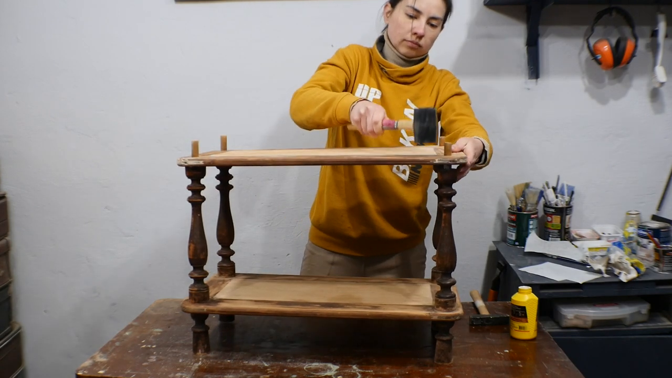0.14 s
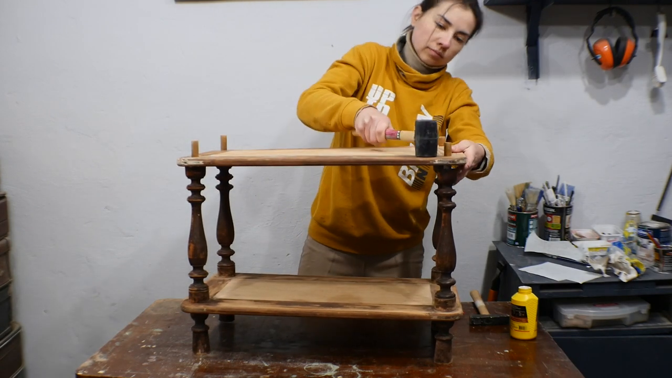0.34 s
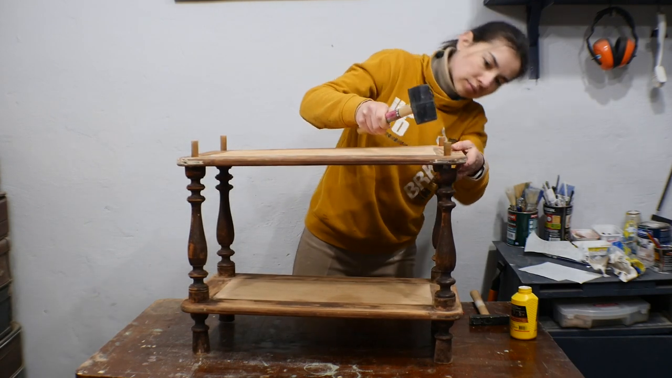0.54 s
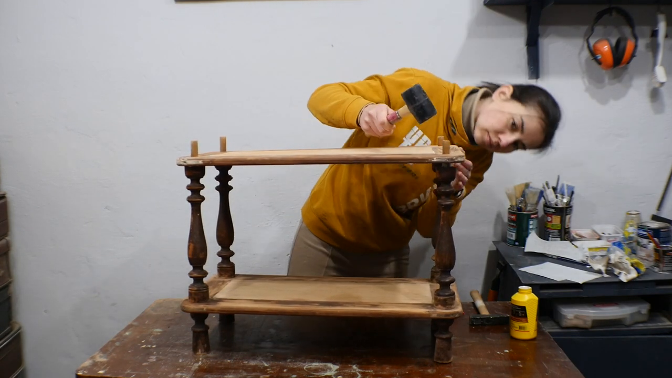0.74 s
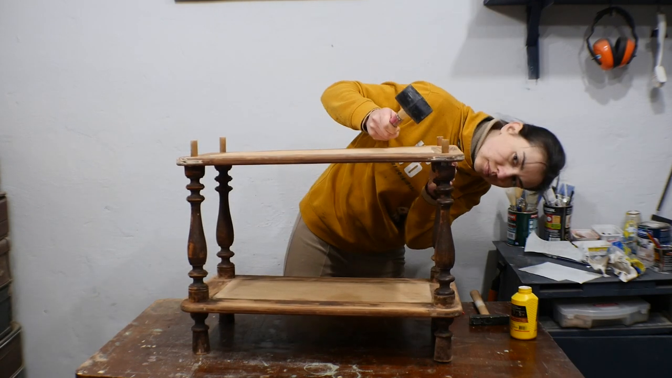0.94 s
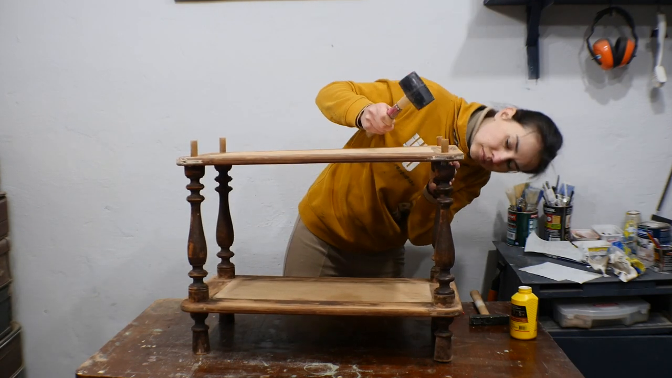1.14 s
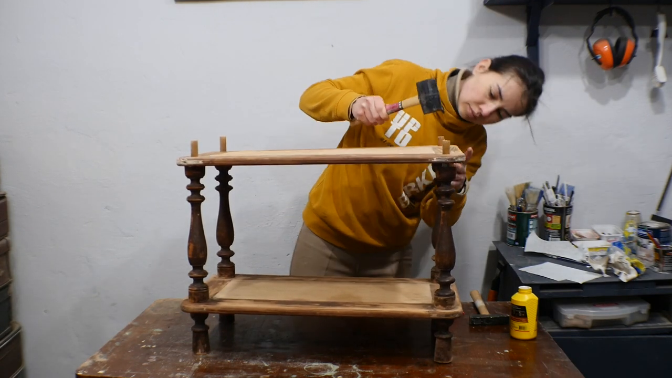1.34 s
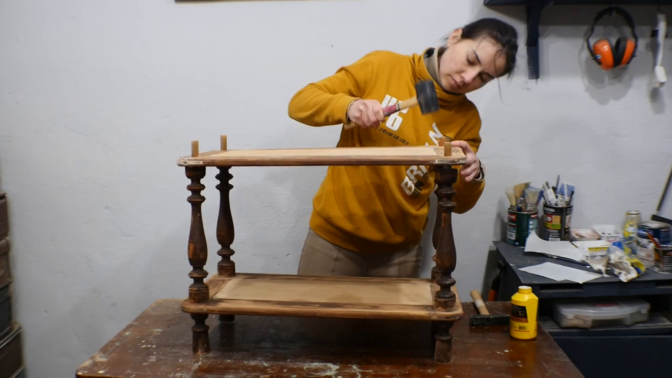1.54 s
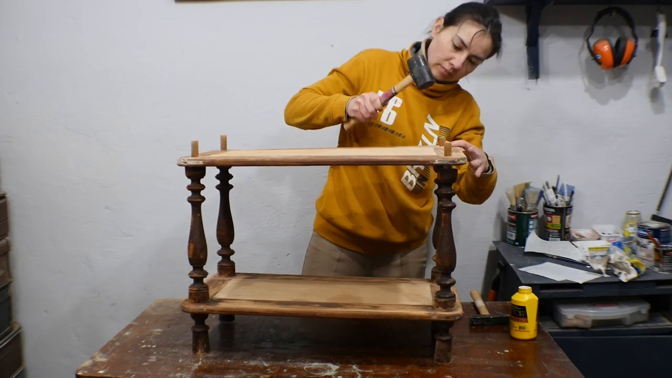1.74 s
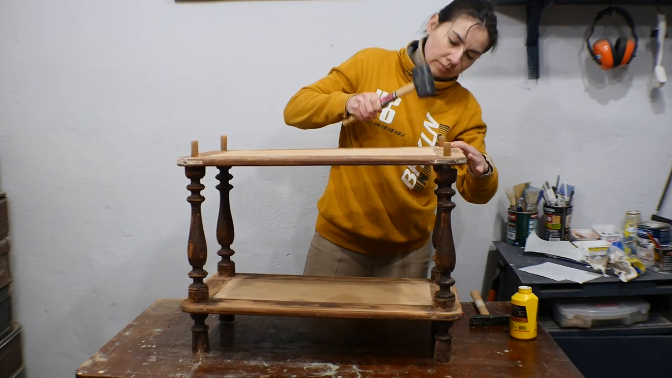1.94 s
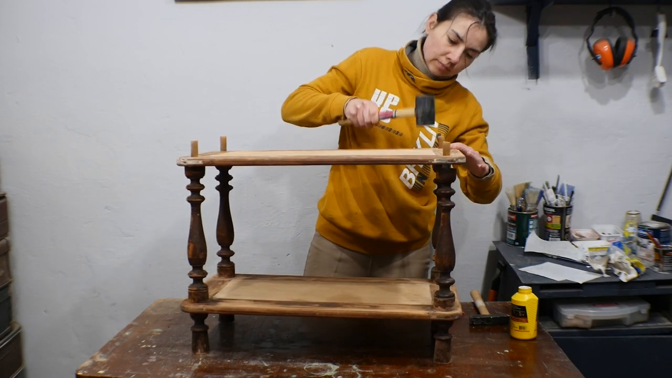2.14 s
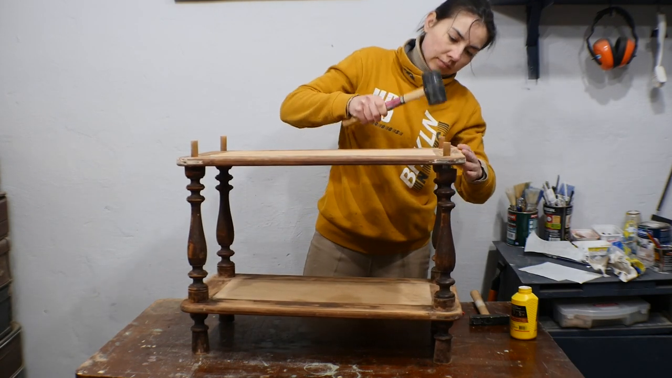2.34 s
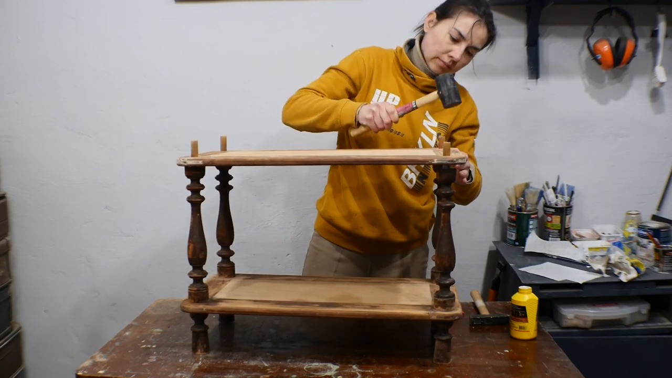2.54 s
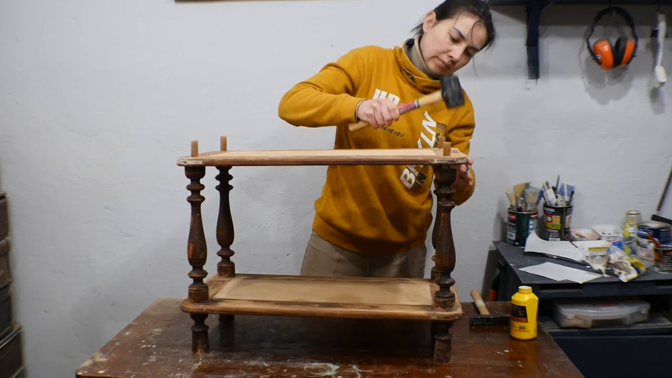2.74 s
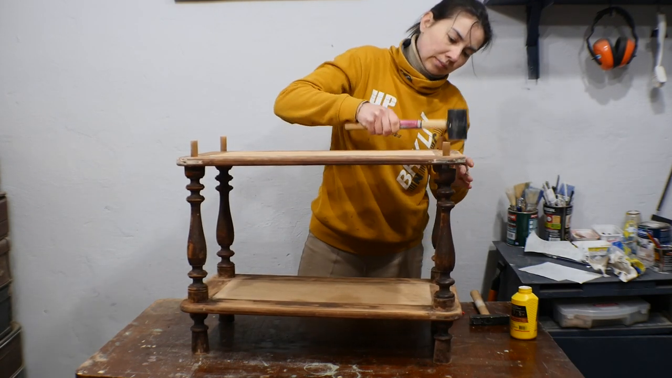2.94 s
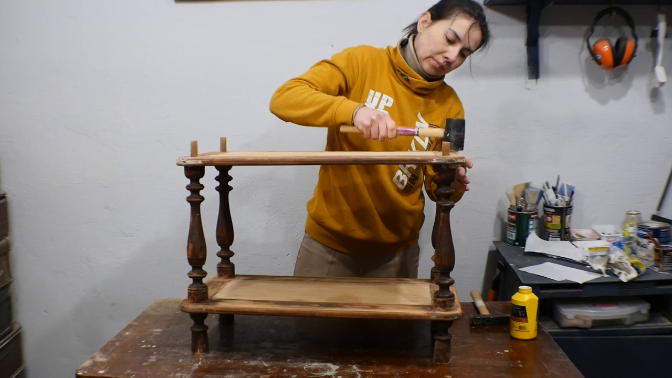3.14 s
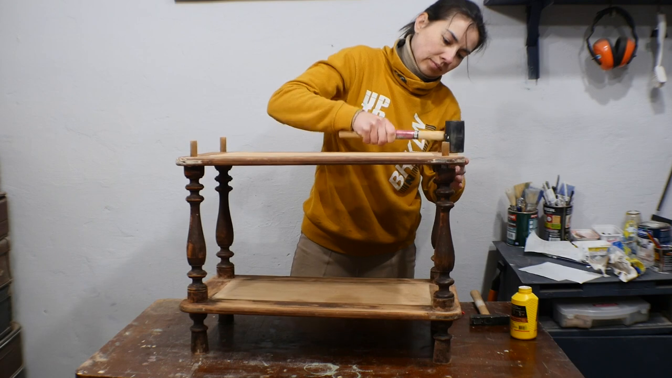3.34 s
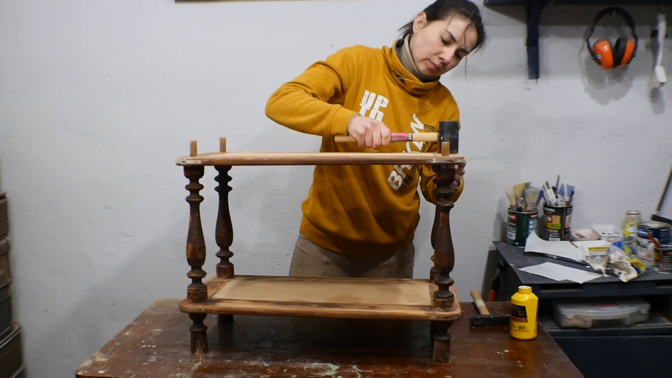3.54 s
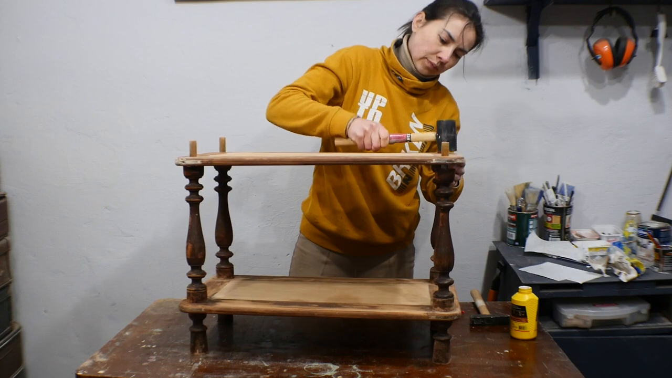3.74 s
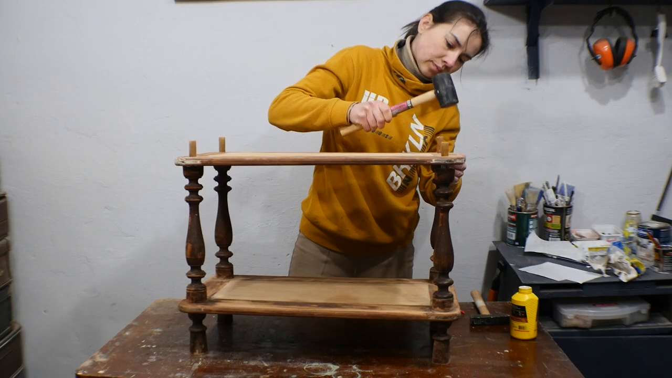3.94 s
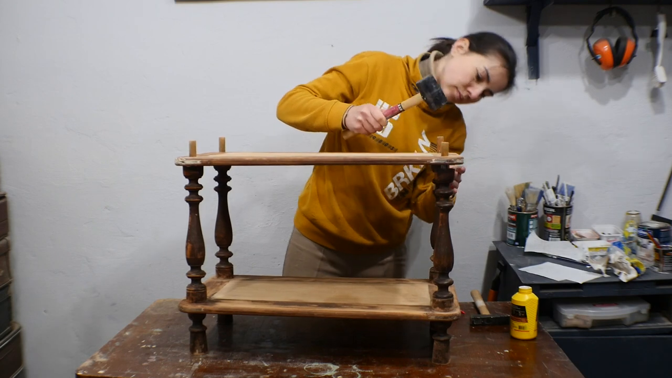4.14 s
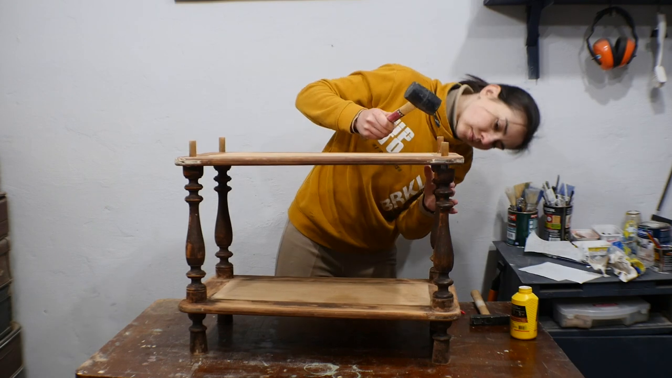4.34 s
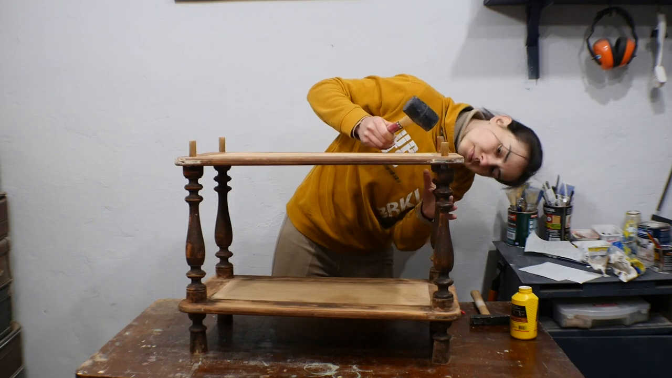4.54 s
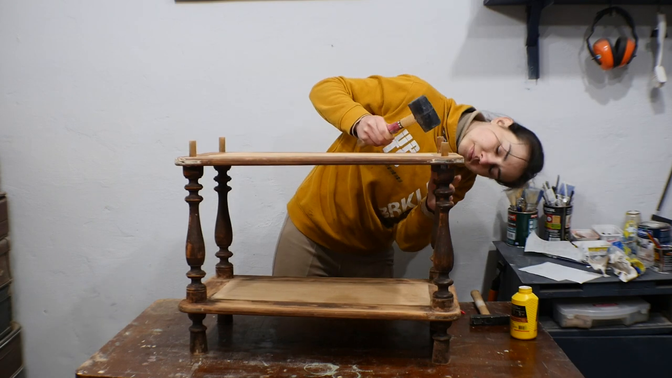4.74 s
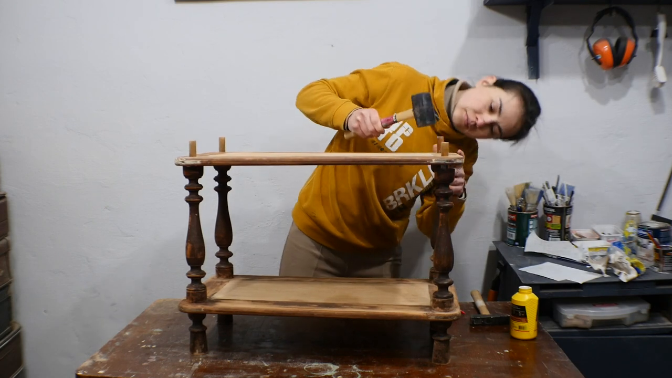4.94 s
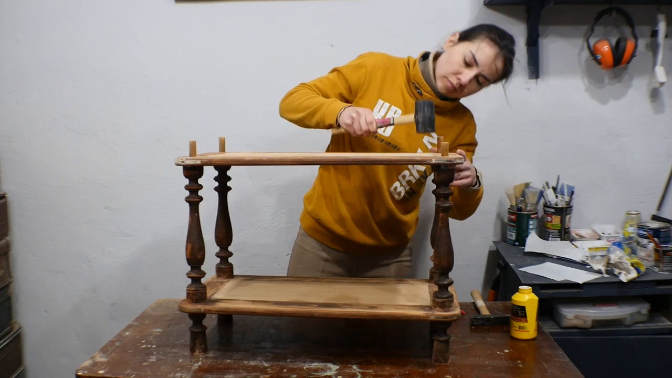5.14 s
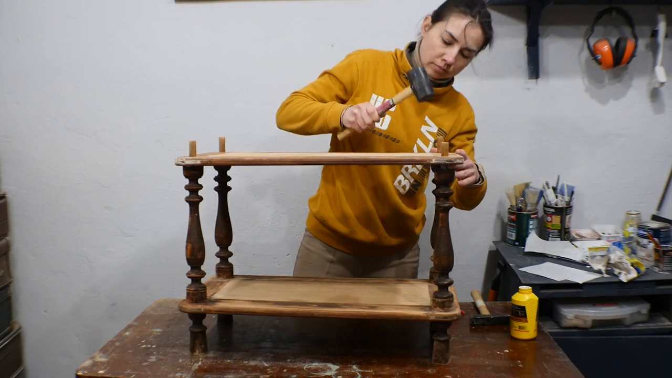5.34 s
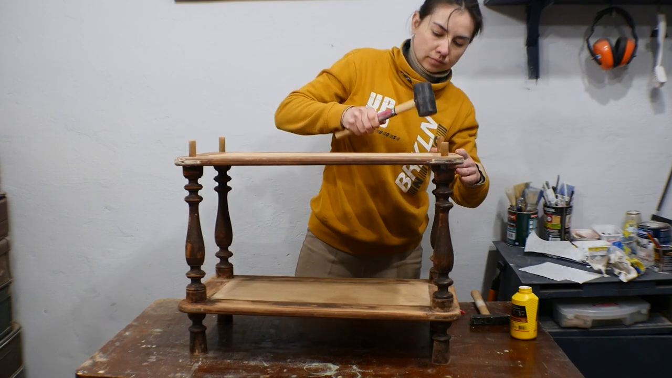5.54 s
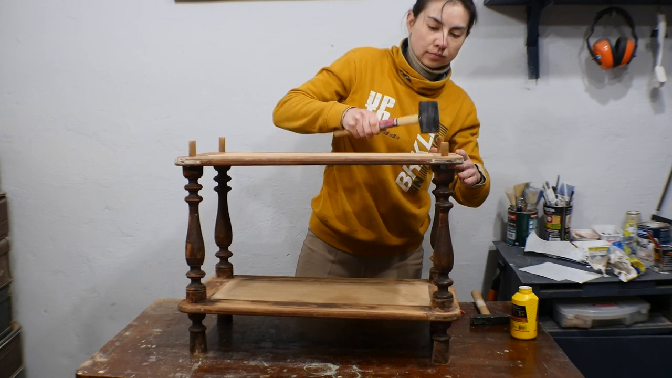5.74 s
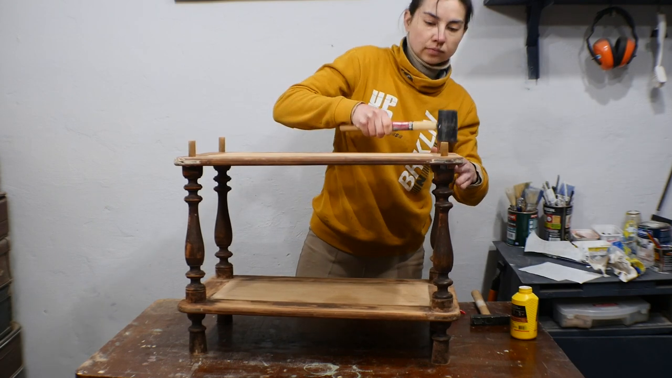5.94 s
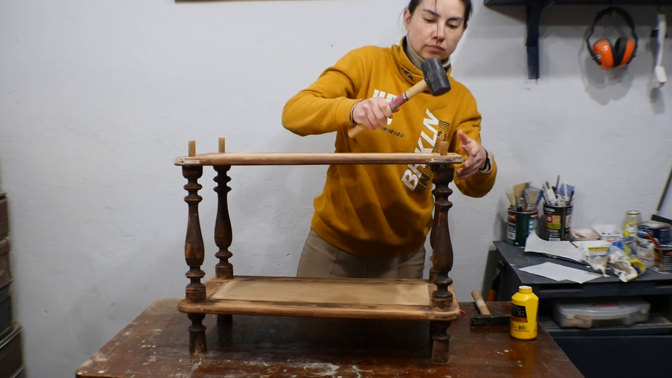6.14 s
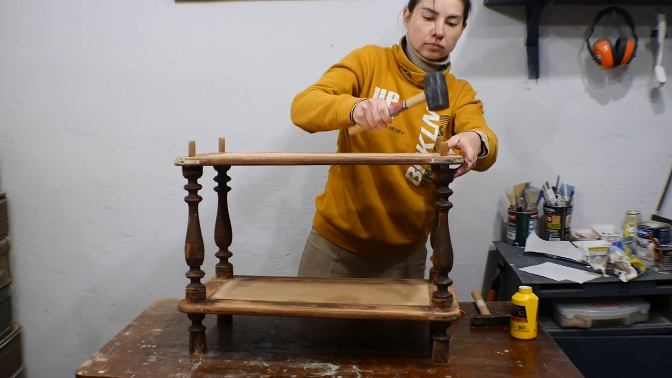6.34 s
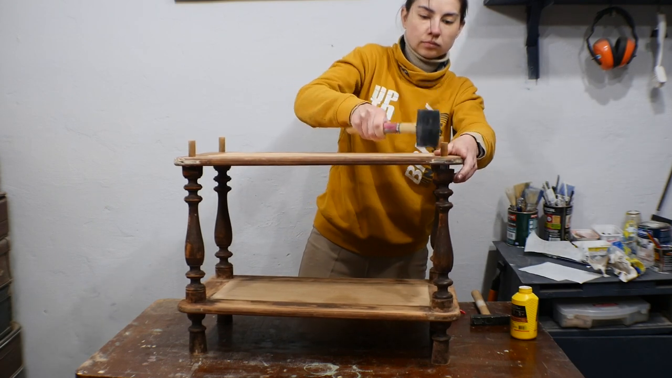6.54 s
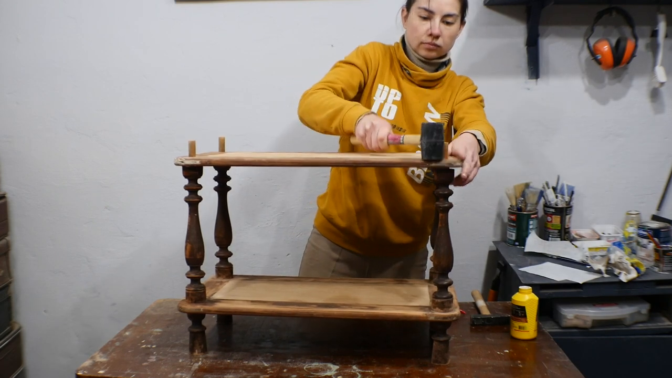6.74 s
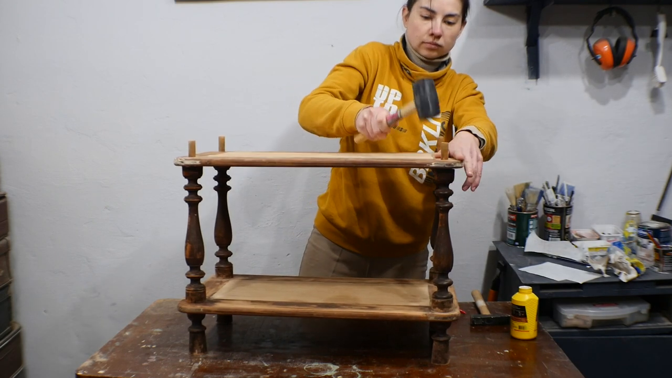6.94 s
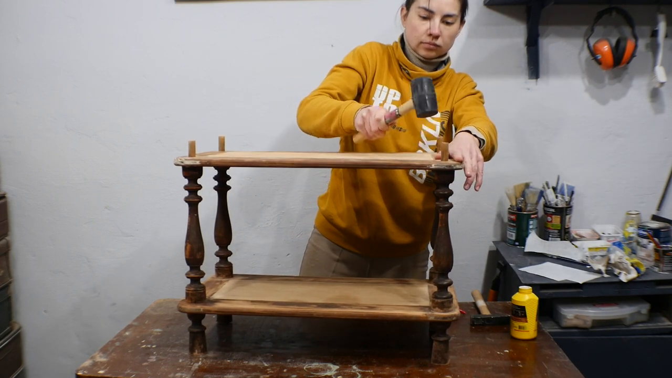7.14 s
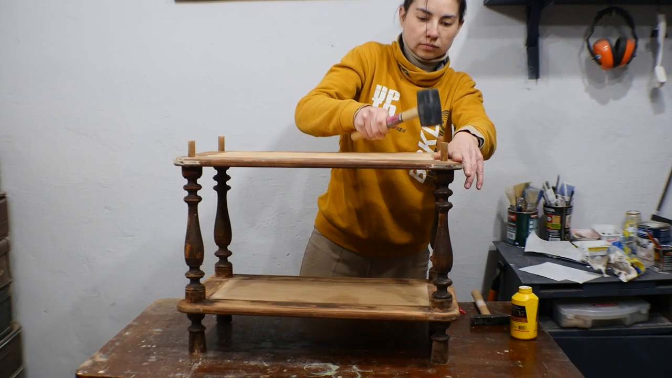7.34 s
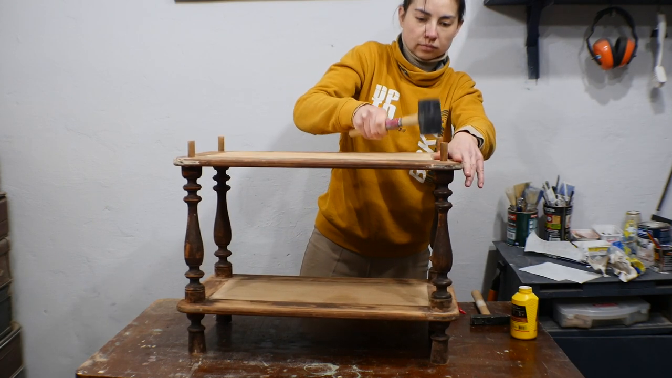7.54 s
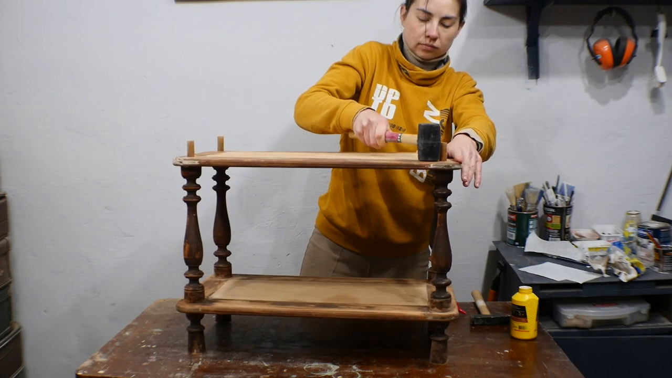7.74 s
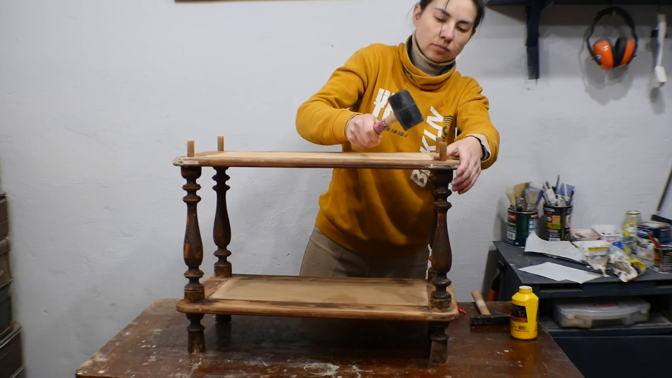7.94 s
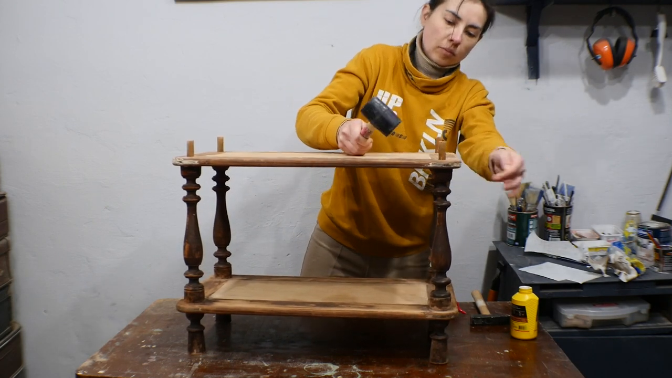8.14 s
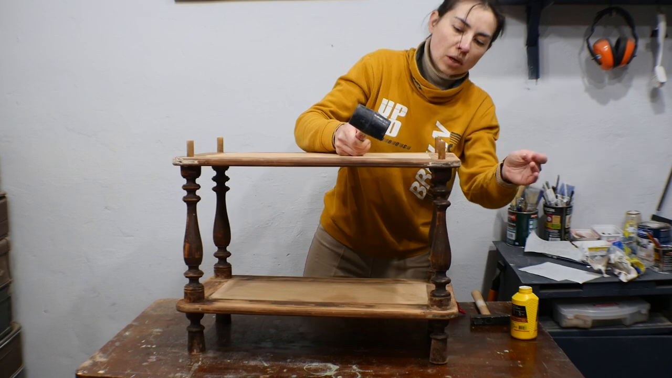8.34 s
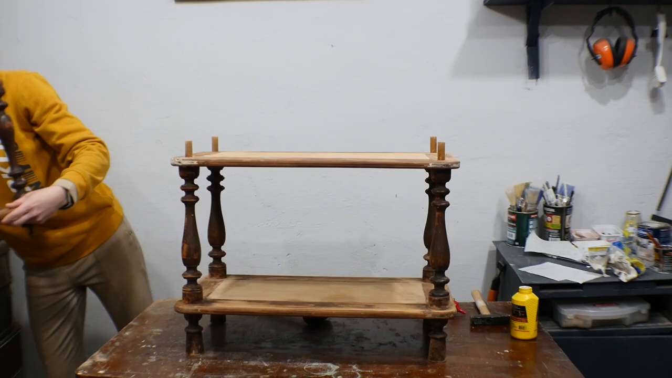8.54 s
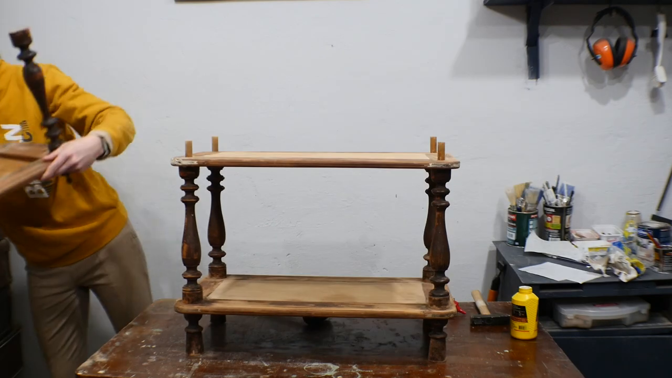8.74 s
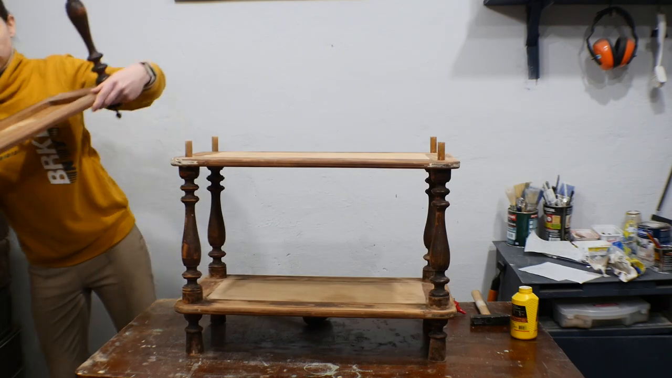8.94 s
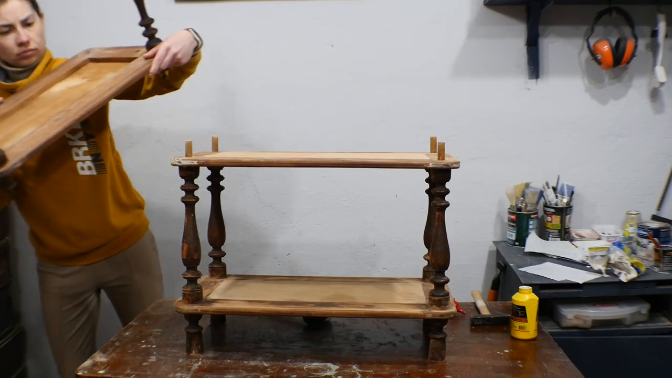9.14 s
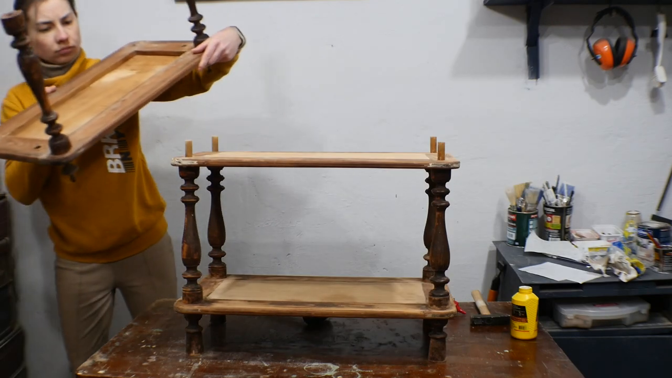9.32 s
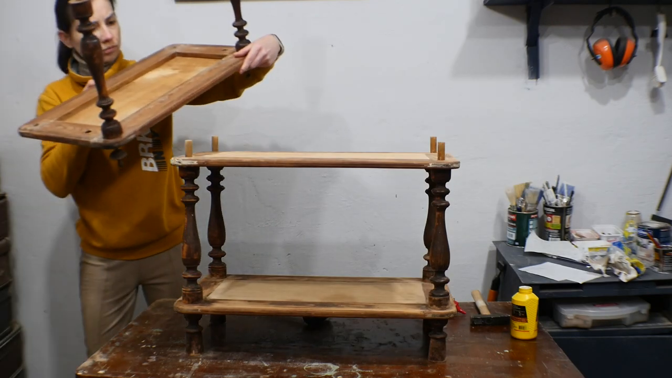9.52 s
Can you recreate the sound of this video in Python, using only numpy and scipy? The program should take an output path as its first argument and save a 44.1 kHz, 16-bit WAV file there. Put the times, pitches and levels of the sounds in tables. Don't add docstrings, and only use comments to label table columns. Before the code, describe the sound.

A rubber mallet strikes a wooden shelf frame close to a stereo microphone in a bare, reflective workshop. The tail of a blow opens the scene, followed by hits at 0.1 and 0.35 s. Faint taps come at 1.4 and 1.65, then a very hard, sharp blow at 1.9 and a weaker one at 2.1. A quieter dull thump falls at 2.7. Five cracking, woody blows run evenly from 2.9 to 3.8. The room tail dies into near silence, with tiny contacts and cloth movement around 4.5-5.1. Three looser, hollow knocks land at 5.5, 5.7 and 5.9. After faint bumps at 6.6, five firm blows run from 6.8 to 7.7, the first strongest. From 8.15 there are soft handling touches and a small bright snap; from 8.5 sleeves rustle, swishing most at 9.1, with soft wood knocks and a dull low drag fading towards 9.7.

```python
import sys
import numpy as np
from scipy import signal
from scipy.io import wavfile
from scipy.ndimage import uniform_filter1d, minimum_filter1d

SR = 44100
rng = np.random.default_rng(int(sys.argv[2]) if len(sys.argv) > 2 else 0)


def field_ratio(decibels):
    return 10 ** (np.asarray(decibels, dtype=float) / 20)


def digitize_waveform(pressure):
    field = np.atleast_2d(pressure).T
    bounded = np.clip(field, -1, 1)
    quanta = np.round(bounded * 32767).astype(np.int16)
    wavfile.write(sys.argv[1], SR, quanta)


N = 426883
LEAD = SR // 4
HZ = np.fft.rfftfreq(512, 1 / SR)

# (frequency [Hz], level [dB])
THUD = [(40, -51.5), (80, -28.5), (150, -4.5), (230, -1.5), (450, -2.5), (800, 3), (1300, 1.5),
        (2000, -8.5), (3200, -36), (5500, -34.5), (11000, -80)]
# (frequency [Hz], level [dB])
CRACK = [(300, -48), (900, -11.5), (1600, 6), (2500, 6.5), (4400, 1), (6800, -3.5), (10500, -6.5),
         (13000, -15), (15500, -20.5), (16800, -49.5)]
# (time [s], level [dB])
LIFT = [(8.517, -0.5), (8.92, 1.5), (9.05, -2), (9.13, -0.4), (9.32, -3.5), (9.68, -4.5)]


def evened(x):
    return x / np.sqrt(np.mean(x ** 2) + 1e-20)


def peaked(x):
    return x / np.sqrt(uniform_filter1d(x ** 2, size=176).max() + 1e-20)


def read(points, hz):
    f, value = np.transpose(points)
    return np.interp(np.log(hz + 1), np.log(f + 1), value)


def follow(rows):
    return np.interp(np.arange(N) / SR, *np.transpose(rows), left=-150, right=-150)


def add(mix, s, sound):
    part = mix[:, LEAD + round(s * SR):][:, :sound.shape[1]]
    part += sound[:, :part.shape[1]]


def tilt(hz):
    return np.log2(np.clip(hz / 600, 1, 6))


def colour(x, points, tilt_db=0):
    hz = abs(np.fft.fftfreq(8192, 1 / SR))
    gain_db = np.maximum(read(points, hz) + tilt_db * tilt(hz), -90)
    log_gain = np.log(field_ratio(gain_db))
    phase = -signal.hilbert(log_gain).imag
    taps = np.fft.ifft(np.exp(log_gain + 1j * phase)).real[:4096]
    return signal.oaconvolve(np.atleast_2d(x), taps[None], axes=1)[:, :x.shape[-1]].squeeze()


def diffuse(gain, count):
    # (frequency [Hz], level [dB])
    width_db = [(60, -31), (110, -42), (200, -34.5), (380, -23), (700, -9.5), (1290, -2.5), (2380, -2),
                (4400, -3.5), (8120, -5), (15000, -11.5)]
    a, b, c, d = rng.standard_normal((gain.shape[1], len(HZ), 4)).T
    mid = a + 1j * b
    side = (c + 1j * d) * field_ratio(read(width_db, HZ) + 3.0)[:, None]
    pair = gain * np.array([mid + side, mid - side])
    return signal.istft(pair, nperseg=512, noverlap=384)[1][:, :count]


def hiss(spectrum, level, patchy_db):
    patches = rng.standard_normal((N // 128 + 8, len(HZ))).T
    patches = uniform_filter1d(uniform_filter1d(patches, size=20, axis=0), size=10, axis=1)
    noise = diffuse(field_ratio(patchy_db * evened(patches)), N)
    return level * evened(colour(noise, spectrum))


def burst(t, t60):
    return rng.standard_normal(len(t)) * field_ratio(-60 * t / t60)


def paired(noise, points, tilt_db=0):
    puff = peaked(colour(noise, points, tilt_db))
    click = colour(1. * (np.arange(len(noise)) == 0), points, tilt_db)
    return np.array([puff, click * np.linalg.norm(puff) / np.linalg.norm(click)])


def workshop(direct, smooth, early_db=-5.5, tail_db=2.5):
    # (frequency [Hz], t60 [s])
    walls = [(60, 1), (125, 0.78), (250, 0.65), (500, 0.54), (1000, 0.51), (2000, 0.48), (4000, 0.47),
             (8000, 0.31), (11500, 0.29), (16000, 0.14)]
    # (delay [ms], level [dB])
    early = [(2.9, -8), (6.3, -0.5), (9.5, -11.5), (13.7, -6), (18.1, -12), (24.4, -26.5), (35.5, -7)]
    # (frequency [Hz], level [dB], t60 [s])
    standing = [(101, -8, 0.57), (153, -2, 0.76), (215.2, -8.5, 0.58), (292.5, -2, 0.45), (356.4, -3, 0.45),
                (452, -3.5, 0.8), (562.5, -12.5, 0.42), (609.7, -9.5, 0.55), (697, -5.5, 0.66)]
    steps = 240
    decay_db = -60 * np.arange(steps) * 128 / SR / read(walls, HZ)[:, None]
    tail = diffuse(field_ratio(decay_db), steps * 128 - 1024)
    t = np.arange(tail.shape[1]) / SR
    tail *= 1 - np.exp(-t / 0.0027)
    tail /= np.linalg.norm(tail[0])
    for hz, db, t60 in standing:
        mode = field_ratio(db - 25.0 - 60 * t / t60) * np.sin(2 * np.pi * hz * t)
        tail += mode / np.sqrt(t60 * SR / 55)
    echoes = np.zeros_like(tail)
    echoes[:, 0] = 1
    for k, (ms, db) in enumerate(early):
        at = round(ms * SR / 1000)
        echoes[[0, 1], [at + 4 * (k % 2), at + 4 * (1 - k % 2)]] = field_ratio(db + early_db)
    responses = np.array([echoes, field_ratio(tail_db) * tail])
    return signal.fftconvolve(np.array([[direct], [smooth]]), responses, axes=2).sum(0)


def frame_modes(board, t, late, hard_db):
    hz, width, db = np.transpose(board)[:, :, None]
    db = db + hard_db * tilt(hz) + 1.9 * rng.standard_normal(hz.shape)
    sign = (-1.) ** np.arange(len(board))[:, None]
    decay = np.exp(-np.pi * np.clip(1.28 * width, 8, 400) * t)
    modes = sign * field_ratio(db) * width * decay * np.sin(2 * np.pi * hz * late)
    is_low = hz[:, 0] < 330
    return modes[is_low].sum(0), modes[~is_low].sum(0)


def blow(board, dull_db, tail_db, boom_db, slam_db, slam_ms, s, strength_db, crack_db, hard_db, aim_db):
    t = np.arange(SR // 5) / SR
    late = t - slam_ms / 1000
    swell = 1 / (1 + np.exp(-(late + .0006) / .0005))
    heave = 1 - np.exp(-(t / 0.0048) ** 2)
    low, high = frame_modes(board, t, late, hard_db)
    low, high = peaked(heave * low), peaked(swell * high)
    thud = paired(swell * burst(t, t60=0.033), THUD, hard_db)
    touch = burst(t, t60=.008)
    slam = field_ratio(slam_db) * (late > 0) * burst(abs(late), t60=0.008)
    crack_tilt = 2.4 + 0.5 * hard_db
    slaps = paired(touch + slam, [(f, d + crack_tilt * np.log2(f / 3500)) for f, d in CRACK])
    aimed = slaps * field_ratio(np.array([[aim_db], [0]]))
    body = field_ratio(-3.5) * (high + field_ratio(dull_db) * thud) + field_ratio(boom_db - 7.5) * low
    direct, smooth = body + field_ratio(crack_db - 7.0) * aimed
    return s + .0006, field_ratio(strength_db) * workshop(direct, smooth, tail_db=tail_db)


def mallet_runs(room):
    # (time [s], strength [dB], crack against body [dB],
    # hardness [dB per octave], crack beamed at the microphone [dB])
    runs = [
        [(-.11, -7, -13, -3, 4), (0.1156, -5, -5, 3, 5), (0.3528, -7, -9, -0.6, 2.5)],
        [(1.3782, -38, -17, -3, 4), (1.6534, -26, -11.5, 1, 0.5)],
        [(1.9005, 1.7, -3, 0.1, 6), (2.1223, -5, -4.1, 2.5, 3)],
        [(2.7243, -16, -13.5, -2, 3)],
        [(2.9372, -8, 0, 0.1, 3.5), (3.1617, -10.2, -1.5, -2.9, 3), (3.377, -7.5, -3, -1.5, 1),
         (3.5863, -12, -4, -3.5, 4), (3.8092, -9, -3, -1, -0.4)],
        [(5.4921, -9, -10, 0.4, 5.5), (5.7003, -8, -13, -2, 1.5), (5.9186, -9.5, -11.5, 1, -2.2)],
        [(6.8132, -0.5, -4.5, -0.5, 6), (7.0538, -6.5, -3, -0.5, 3.5), (7.284, -7.5, -10, -2, 3),
         (7.505, -4.5, -12.5, -1, 3.5), (7.7121, -7, -8, -2, -1)],
    ]
    # (dull share [dB], room tail [dB], low boom against body [dB],
    # slam against first touch [dB], slam delay [ms])
    manners = [(-2, 0, -7.5, 4.5, 2.8), (-1, 7, -10, 3, 1.1), (-1, -0.5, -8.5, 0.2, 2.8),
               (-12.5, 2.7, 6, 8, 2.4), (1, 0, -1.5, 11.5, 2.7), (-5, 1.5, 3, 3.5, 2.6),
               (1, -1, -9.5, 3.5, 2.9)]
    # (frequency [Hz], width [Hz], level [dB])
    corner = [(95, 2.6, -16.5), (163, 55, -5.5), (230, 89, 0.5), (274.4, 9.1, -1), (345, 69, -5),
              (403.7, 11, 1), (477, 14, -1.5), (572, 50, -2), (618.6, 24, -0.5), (668, 50, -2.5),
              (830, 56, -4.5), (888, 73, -7), (1024, 48, -5.5), (1045, 36, -7), (1223, 540, -13),
              (1330, 57, -12), (1526, 9.3, -18.5), (1950, 71, -31.5)]
    # (frequency [Hz], width [Hz], level [dB])
    tapped = [(164, 27, -9), (345, 25, 2.5), (470, 27, -8.5), (670, 22, 0.5), (927, 29, -9), (1210, 84, -5),
              (1450, 31, -10.5), (1790, 72, -14), (2150, 120, -19), (2500, 140, -25.5)]
    # (frequency [Hz], width [Hz], level [dB])
    loose = [(99, 6.7, -24.5), (167, 16, -18.5), (213, 64, 2), (280, 68, 4), (391, 7, -6), (481, 55, -7.5),
             (550, 89, -2.5), (646, 40, -5), (622, 68, -22.5), (910, 150, -8.5), (960, 70, -16),
             (1183, 50, -20.5), (1650, 73, -26.5)]
    boards = [corner, tapped, corner, loose, corner, loose, corner]
    for run, board, manner in zip(runs, boards, manners):
        for row in run:
            add(room, *blow(board, *manner, *row))


def room_tone():
    # (frequency [Hz], level [dB])
    air = [(25, -6), (60, -11), (110, -4.5), (190, -6), (230, 5), (270, -3.5), (385, -1), (450, -4),
           (900, -11.5), (1800, -21), (3500, -27), (8000, -64)]
    # (time [s], level [dB])
    stirring = [(0, -53), (.9, -68.5), (1.3, -70.5), (2.6, -67.5), (4.4, -76), (4.85, -78), (5.0, -67.5),
                (5.45, -72), (6.5, -73.5), (8.2, -60.5), (8.5, -75), (9.69, -56.5)]
    return hiss(air, field_ratio(follow(stirring)), patchy_db=1.2)


def self_noise():
    # (frequency [Hz], level [dB])
    spectrum = [(20, 5), (60, 4.5), (150, -8.5), (1000, 7.5), (3000, -5.5), (6500, -5.5), (10500, -3),
                (12800, -13.5), (13500, -32.5)]
    mid, side = rng.standard_normal((2, N))
    return field_ratio(-83) * evened(colour(np.array([mid + 0.26 * side, mid - .3 * side]), spectrum))


def swishes():
    # (time of the peak [s], peak level [dB], rise [dB per s], fall [dB per s])
    movements = [(1.45, -80.5, 66, 30), (1.66, -65, 155, 76), (4.65, -83, 302, 145),
                 (4.78, -80.5, 900, 150), (4.87, -82.5, 150, 150), (4.985, -74.5, 904, 76),
                 (5.115, -78, 900, 111), (8.15, -62, 280, 229), (8.521, -46.5, 3004, 85),
                 (8.92, -55.5, 120, 143), (8.967, -48, 398, 304), (9.035, -52, 400, 204),
                 (9.109, -39.5, 356, 189)]
    t = np.arange(N) / SR
    return sum(field_ratio(db - np.maximum(rise_db * (s - t), fall_db * (t - s))) for s, db, rise_db, fall_db in movements)


def sleeve_rustle():
    # (frequency [Hz], level [dB])
    cloth = [(400, -28.5), (900, -9.5), (1620, -3), (2540, 0), (6640, -3), (10900, -1), (14000, -8.5),
             (15600, -14), (16100, -48.5)]
    steady = field_ratio(-58.5 + 0.48 * follow(LIFT))
    return hiss(cloth, swishes() + steady, patchy_db=1.34)


def knock(s, peak_db, hz, tick_db):
    t = np.arange(SR // 5) / SR
    t60 = .07 * (300 / hz) ** 0.18
    swell = 1 - np.exp(-t / .004)
    ring = peaked(swell * field_ratio(-60 * t / t60) * np.sin(2 * np.pi * hz * t))
    bump = paired(swell * burst(t, t60), THUD, tilt_db=-25.0)
    tick = paired(burst(t, t60=0.009), CRACK, tilt_db=0.5)
    direct, smooth = ring + field_ratio(-11.0) * bump + field_ratio(tick_db - 12.5) * tick
    return s, field_ratio(peak_db - 6.5) * workshop(direct, smooth, tail_db=-0.5)


def soft_knocks(room):
    # (time [s], peak level [dB], pitch [Hz], tick [dB])
    contacts = [(1.626, -45, 349, -8), (1.869, -31.5, 189, -31), (2.688, -54.5, 345, -3.5),
                (4.457, -60.5, 234.7, -25.5), (4.6, -66, 222, -20.5), (4.91, -68.5, 380, -17),
                (5.005, -58.5, 547, -3), (5.108, -72.5, 1960, -6), (5.109, -73, 241, 9),
                (5.112, -76, 5000, -8), (5.12, -70, 2450, -9.5), (5.149, -64, 657, -16.5),
                (6.559, -44.5, 306, -46), (6.575, -49, 112, -37), (6.576, -44, 383, -39.5),
                (6.583, -42.5, 217, -33), (6.63, -49.5, 224.4, -39.5), (8.15, -56, 230, -30.5),
                (8.319, -50.5, 243, -20.5), (8.35, -57, 110, -33), (8.36, -64.5, 2440, -6),
                (8.75, -45, 756, -12), (8.913, -37, 408, -5), (9.047, -33.5, 238, -25),
                (9.07, -33, 224, -25)]
    for row in contacts:
        add(room, *knock(*row))


def bright_decay(room):
    # (time [s], peak level [dB], t60 [s])
    decays = [
        (8.349, -50, 0.052),
    ]
    # (frequency [Hz], level [dB])
    spectrum = [(710, -52.5), (1200, -25.5), (1470, -27.5), (2180, -6), (3470, -13), (8630, 1.5),
                (14400, 1.5), (16000, -19)]
    t = np.arange(SR // 5) / SR
    for s, peak_db, t60 in decays:
        direct, smooth = paired(burst(t, t60), spectrum)
        add(room, s + 0.0023, field_ratio(peak_db + 1.5) * workshop(direct, smooth, tail_db=6.0))


def shelf_drag():
    # (frequency [Hz], level [dB])
    drag = [(29, -64), (50, -33.5), (185, -1.5), (218, -3.5), (328, -9), (400, -5.5), (582, -12),
            (745, -10), (1630, -19.5), (2500, -27), (3250, -31), (5500, -120)]
    return hiss(drag, field_ratio(-49 + follow(LIFT)), patchy_db=.7)


def scene():
    room = np.zeros((2, N + LEAD))
    mallet_runs(room)
    soft_knocks(room)
    bright_decay(room)
    room = signal.sosfilt(signal.butter(2, 80., 'high', fs=SR, output='sos'), room)
    return room[:, LEAD:] + room_tone() + self_noise() + sleeve_rustle() + shelf_drag()


def roll_off(x):
    return signal.sosfilt(signal.butter(12, 16640, fs=SR, output="sos"), x)


def record(dry):
    dry = signal.sosfilt(signal.butter(2, 35., 'high', fs=SR, output='sos'), dry)
    heard = dry - 0.65 * signal.lfilter(*signal.iirpeak(7850, 14, SR), dry)
    peak_db = 20 * np.log10(abs(heard).max(0) + 1e-9)
    fall = np.arange(N) * 70.3 / SR
    held_db = np.maximum.accumulate(peak_db + fall) - fall
    over_db = np.maximum(held_db + 11.0, 0)
    ahead_db = -minimum_filter1d(-over_db, size=201)
    cut_db = 0.79 * uniform_filter1d(ahead_db, size=101)
    return roll_off(heard / field_ratio(cut_db))


dry = scene()
out = record(dry)
digitize_waveform(out)
```